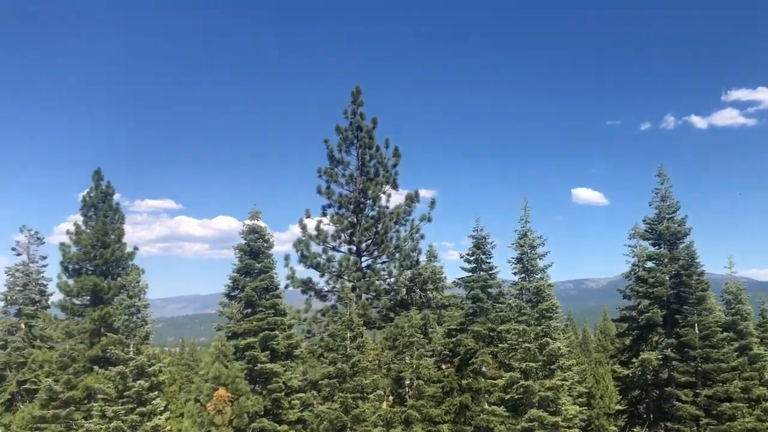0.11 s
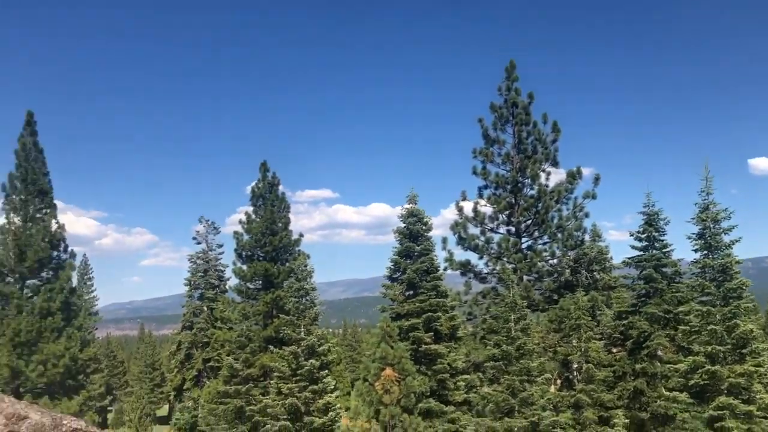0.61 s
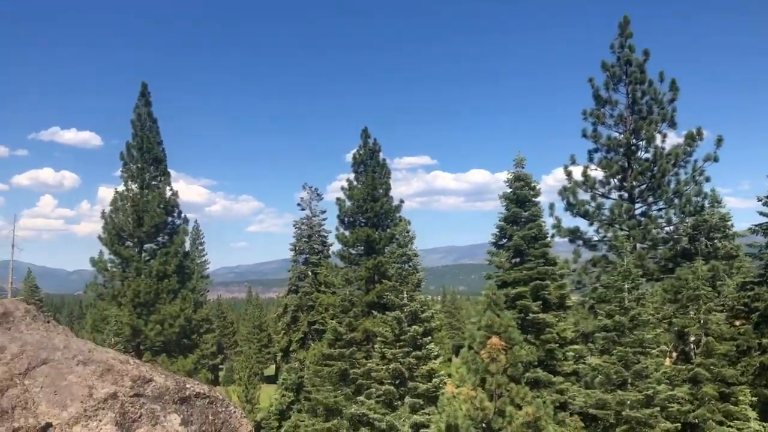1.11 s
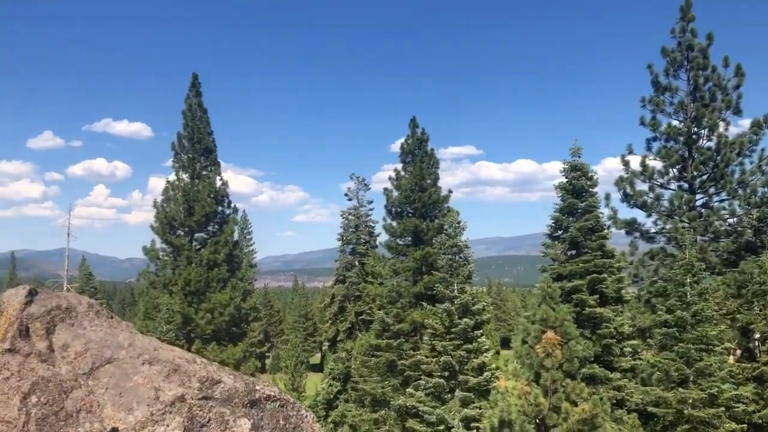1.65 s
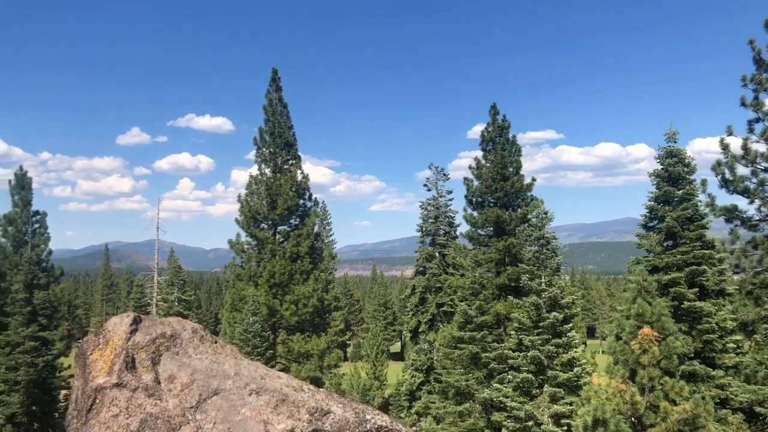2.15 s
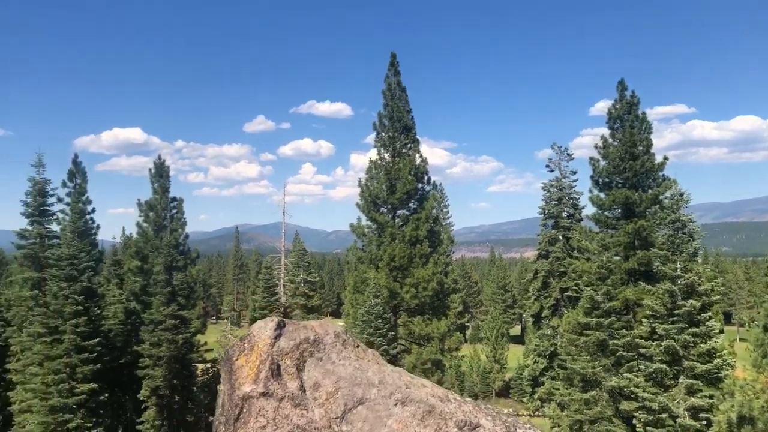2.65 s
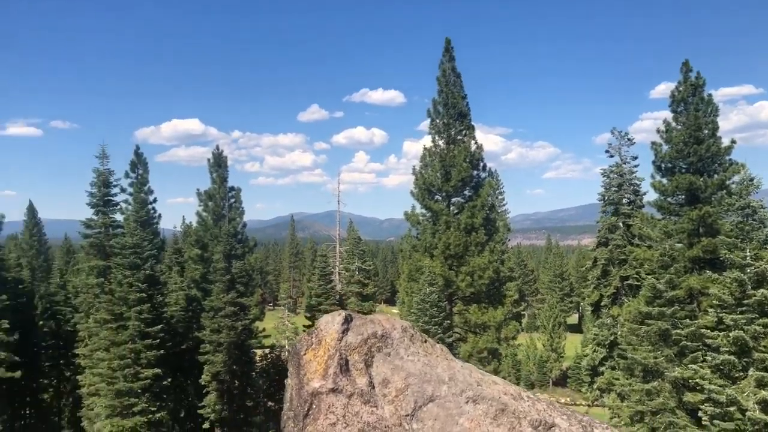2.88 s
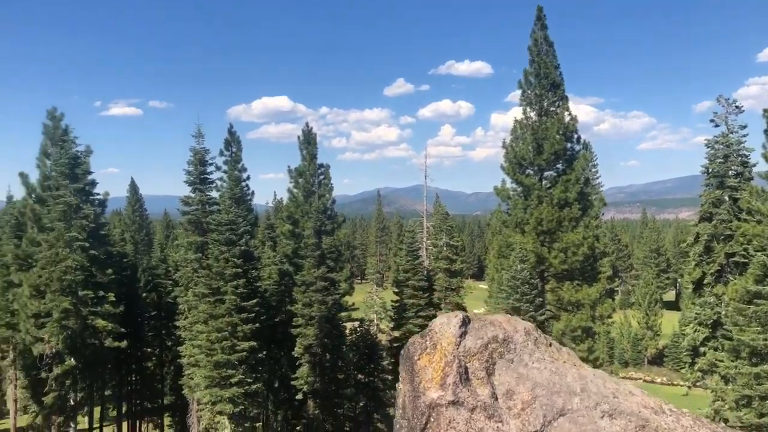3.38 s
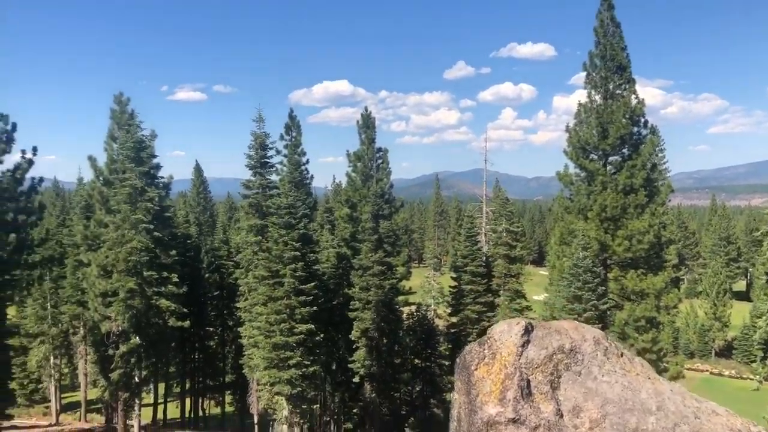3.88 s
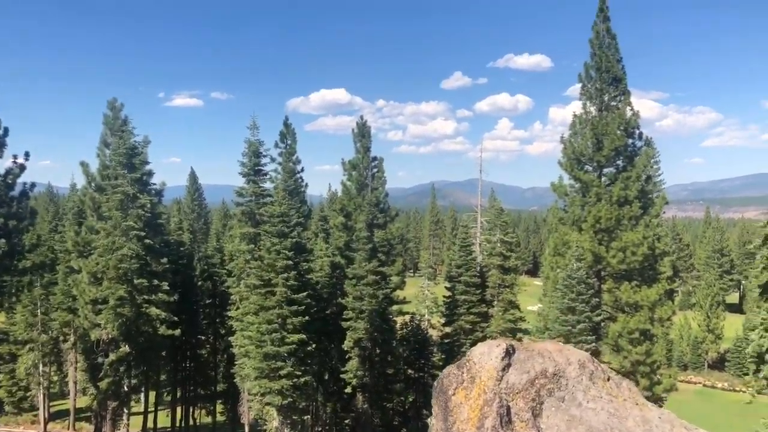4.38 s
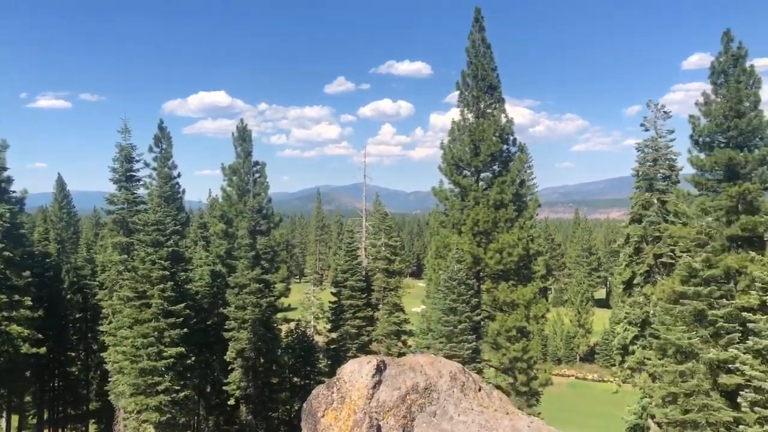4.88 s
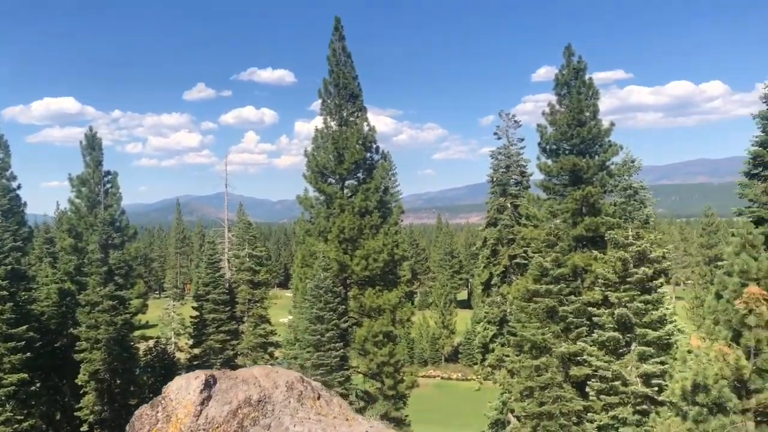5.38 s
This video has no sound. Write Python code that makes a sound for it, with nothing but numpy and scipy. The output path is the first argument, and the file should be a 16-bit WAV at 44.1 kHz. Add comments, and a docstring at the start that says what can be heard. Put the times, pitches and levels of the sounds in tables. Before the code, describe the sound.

Close to a phone microphone in the open, someone shifts on a rock above a pine forest. Soles scuff and grit cracks sharply from the start; around one second weight lands with dull thuds and small metal pieces clink briefly. Movement stays busy until about two seconds, then thins to sparse scuffs and soft thuds. Faint far wind and a wavering low hum continue underneath, with a deep soft thud near the end.

```python
"""Someone shifts about on a rock above a pine forest, holding a phone.
Far wind (shaped noise) and a low hum (two tones and a fuzzy band) lie under it all; a faint gust comes early.
From the start, soles scuff (grainy noise) and crack grit (noise bursts that ring), and weight lands with
dull thuds (short low tones). From about 0.9 to 1.9 s small metal pieces clink (fading sines).
Then the scuffs, cracks and thuds thin out, and a deep thud comes near the end, at 4.8 s."""
import sys
import numpy as np
from scipy import signal
from scipy.fft import rfft, irfft
from scipy.io import wavfile
from scipy.ndimage import uniform_filter1d

SR = 44100
rng = np.random.default_rng(int(sys.argv[2]) if len(sys.argv) > 2 else 0)


def transcribe(u):
    """Save the signal u as a 16-bit wav file named by the first command-line argument.

    u: samples, shape (n,) or (channels, n), limited to [-1, 1]; the rate is SR.
    q: integer samples, one column per channel.
    """
    v = np.clip(np.atleast_2d(u).T, -1, 1)
    q = np.round(v * 32767).astype(np.int16)
    wavfile.write(sys.argv[1], SR, q)


def boost(x):
    """Linear amplitude factor 10**(x/20) for a level x in decibels (scalar or array-like)."""
    u = np.asarray(x, float) / 20
    return 10 ** u


N = 243431  # length in samples, about 5.5 s

# Tone colour of wind in distant pines and the far valley rumble: f/Hz, level per Hz/dB
WIND_COLOUR = [(15, -86), (25, -25.5), (55, -10.5), (110, -6), (236, -10), (427, -16.5), (734, -23),
               (1100, -26), (2110, -37.5), (4500, -43.5), (10700, -49.5), (16000, -53.5)]
# How the hum wavers: t/s, level of low tone/dB, level of high tone/dB
HUM_LEVELS = [(0, -62, -54.5), (1.1, -63, -57), (1.4, -59, -77), (2, -57.5, -61), (2.8, -57.5, -58.5),
              (3.3, -56.5, -55.5), (3.5, -71, -56), (3.75, -58, -52), (4.4, -63.5, -53.5), (5.52, -69, -61)]
# Small metal pieces; each is a list of its modes (the tones it rings at): f/Hz, level/dB, time to fade by 60 dB/s
METAL_PIECES = [
    [(7940, 0, .065), (9520, 0, .065), (12530, -12, .045), (15500, -11, .05)],
    [(5650, 0, .03), (12200, 0, .05)],
    [(6440, 0, .06), (8740, 0, .035), (10600, -9, .08)],
    [(14050, 0, .035), (9950, 0, .035)],
    [(4850, 0, .15)],
]
# Blows on the metal; the pitch picks the piece: t/s, level/dB, pitch f/Hz, upper modes' extra level/dB
CLINK_BLOWS = [(.8824, -59, 7840, 4.5), (.9153, -57, 6440, -14), (.9338, -59, 7870, -8),
               (.9986, -58.5, 7880, -11), (1.051, -67, 7940, -12), (1.0964, -49.5, 7950, -6.5),
               (1.1348, -52.5, 7970, -12), (1.486, -50, 13700, -13), (1.496, -61.5, 6440, 4),
               (1.5643, -61, 5500, -6), (1.613, -62, 7760, -17), (1.6402, -57.5, 6440, 3.5),
               (1.7114, -55, 5600, -8), (1.7978, -53, 5580, -10), (1.8427, -61, 5650, -19),
               (1.9014, -65, 4850, -2)]
# Weight landing on the rock: t/s, peak level/dB, pitch f/Hz, time to fade by 60 dB/s
THUD_LANDINGS = [(0.3073, -46.5, 301, 0.029), (.8845, -38.5, 253, 0.022), (.9025, -34, 280, 0.032),
                 (.918, -34.5, 156, 0.081), (0.938, -38, 330, 0.025), (1.348, -46.5, 137, 0.13),
                 (1.588, -38.5, 190, 0.065), (1.599, -38.5, 206, 0.041), (1.875, -43, 445, 0.033),
                 (1.896, -44, 257, 0.044), (2.388, -41, 203, 0.052), (2.416, -38, 232, 0.038),
                 (2.475, -41, 258, 0.033), (3.138, -39.5, 236, 0.048), (3.159, -44, 290, 0.039),
                 (3.858, -42, 260, 0.054), (4.81, -42, 81, .26)]
# Soles and cloth dragged over stone, one row a stroke: middle t/s, length/s, level/dB, hiss against body/dB
SCUFF_STROKES = [(0.042, 0.048, -62, -2.5), (0.1, 0.041, -60.5, -3), (0.211, 0.15, -70.5, 1),
                 (0.337, 0.12, -65.5, -3), (0.435, 0.061, -67.5, 9), (0.46, 0.63, -75.5, 8),
                 (0.923, 0.088, -54, -11), (1.015, 0.17, -62.5, -7), (1.114, 0.052, -60, -22),
                 (1.362, 0.39, -68.5, 1.5), (1.49, 0.031, -51, -23), (1.59, 0.13, -69, 1),
                 (1.648, 0.047, -49.5, -31), (1.748, 0.18, -64, -1.5), (1.87, 0.17, -62.5, -11),
                 (2.06, 0.24, -68, -4.5), (2.162, 0.12, -69.5, -11), (2.457, 1, -72, -5),
                 (3.269, 0.15, -67, -3.5), (3.97, 0.49, -72.5, -9), (4.464, 0.048, -64.5, -27)]
# Tone colour of the dull part of a scuff: f/Hz, level per Hz/dB
SCUFF_BODY_COLOUR = [(200, -6), (500, 21), (1300, 4.5), (2300, 7), (3500, -7), (10000, -16)]
# Tone colour of the bright part of a scuff: f/Hz, level per Hz/dB
SCUFF_HISS_COLOUR = [(1000, -16), (2500, -3), (5500, 0), (9000, -6), (16000, -9)]
# Pitches of four grain sizes, each snapping at its own moments: f/Hz
GRAIN_PITCHES = [900, 1600, 2600, 4200]
# The loudest grit cracking under a sole: t/s, level/dB, knock f/Hz, treble against that level/dB
GRIT_CRACKS = [(0.0355, -44.5, 1690, -11.5), (0.092, -53, 3400, 11), (.124, -51, 1220, -16),
               (0.3055, -45, 1700, 6.5), (.883, -43, 1370, -10), (0.894, -58, 1750, -20),
               (.9021, -51, 1170, 4.5), (0.916, -55, 1750, -14), (.9275, -43, 1280, -20),
               (0.9367, -42.5, 1820, -14), (0.955, -55, 2610, -17), (0.9985, -44.5, 2190, -28),
               (1.004, -49.5, 1310, -24), (1.0105, -58, 1900, -20), (1.096, -48.5, 3550, -5),
               (1.096, -46.5, 1400, -26), (1.1124, -49, 1210, -24), (1.127, -54, 3500, -6),
               (1.1346, -50.5, 1900, -11), (1.4851, -41, 4640, -8), (1.5865, -50.5, 1410, -21),
               (1.596, -44.5, 1570, -18), (1.612, -48, 1380, -9), (1.637, -42.5, 1830, -21),
               (1.6461, -40, 2180, -12), (1.6518, -38, 1380, -7.5), (1.7472, -55, 2200, -28),
               (1.755, -46, 2210, -22), (1.7918, -42, 1970, -17), (1.8073, -50, 1510, -14),
               (1.85, -60, 1270, -10), (1.8774, -51, 1990, -9), (1.8995, -65, 1980, -22),
               (1.9142, -37, 2190, -17), (1.9294, -51, 1950, -4), (1.954, -55.5, 2780, -10),
               (2.125, -53.5, 2230, -16), (2.157, -57, 1720, -24), (2.414, -51, 1230, -13),
               (2.615, -57.5, 1880, -23), (3.137, -52.5, 1670, -5.5), (3.1385, -51, 5000, -14),
               (3.4, -57.5, 3130, -23), (3.926, -63, 2630, -10), (3.964, -56, 1580, -21),
               (4.025, -56, 2200, -8), (4.111, -59.5, 1910, -20)]
# Tones a loose stone rings at: multiple of the knock pitch (no unit), level/dB
STONE_MODES = [(.6, -5), (1, 0), (1.66, -8)]

WIND_DB, GUST_WAVER_DB = -54.5, 0.7
GUST_PEAK_S, GUST_LENGTH_S, GUST_PEAK_DB = 0.39, 2.6, 1  # one long gust passes early
LOW_HZ, HIGH_HZ, DRONE_HZ = 60.76, 130.4, 102.3
DRONE_DB, DRONE_WAVER_DB = -63, 3  # the fuzzy band between the tones comes and goes
DRONE_FOLLOWS = 0.99  # share of the high tone's dB changes that the band takes over
GRIT_PER_S, GRIT_SPREAD_DB = 250, 3  # snaps per second for each grain size
BODY_GRIT_SHARE, HISS_GRIT_SHARE = 0.65, 0.25  # snaps against smooth noise
CRACK_RISE_S, CRACK_T60_S = 0.0002, 0.022  # T60 is the time to fade by 60 dB
# Width as a share of the knock pitch, for treble at 0 dB; a duller crack rings more purely
KNOCK_WIDTH, NARROWS_PER_DB, NARROWEST = 0.55, 0.015, 0.27
MODE_SPREAD_DB, LOW_LAG_CYCLES = 2, 2.99  # no two stones alike; the lower mode comes later
CRUNCH = 0.3  # broad crushed sound around each knock, as a factor


def evened(x):
    """Scales to an rms (average strength) of one."""
    return x / np.sqrt(np.mean(x ** 2) + 1e-20)


def add(mix, s, sound):
    """Mixes a sound in at a time in seconds, cutting what runs past the end."""
    part = mix[round(s * SR):][:len(sound)]
    part += sound[:len(part)]


def coloured(x, points):
    """Filters a long signal by a spectrum, then scales it to an rms of one."""
    f, db = np.transpose(points)
    hz = np.fft.rfftfreq(len(x), 1 / SR)
    curve_db = np.interp(np.log(hz + 1), np.log(f + 1), db)
    return evened(irfft(rfft(x) * boost(curve_db), len(x)))


def band(x, hz, width):
    """Keeps the sound around one pitch, as a resonance does, with a peak of one."""
    out = signal.lfilter(*signal.iirpeak(hz, hz / width, SR), x)
    return out / abs(out).max()


def steep_band(x, hz, width):
    """Passes through the same resonance twice, so less is left on either side."""
    return band(band(x, hz, width), hz, width)


def wander(per_s):
    """Random drift of rms one; a higher rate drifts faster."""
    steps = round(SR / per_s)
    return evened(uniform_filter1d(uniform_filter1d(rng.standard_normal(N), steps), steps))


def wind():
    """Wind far off is smooth noise; its level swells with one gust and drifts a little."""
    t = np.arange(N) / SR
    gust_db = GUST_PEAK_DB * np.exp(-((t - GUST_PEAK_S) / GUST_LENGTH_S) ** 2)
    gust_db = gust_db + GUST_WAVER_DB * wander(4.0)
    return boost(WIND_DB + gust_db) * coloured(rng.standard_normal(N), WIND_COLOUR)


def unsteady_tone(hz, drift_hz):
    """A sine of rms one whose pitch drifts slowly."""
    cycles = np.cumsum(hz + drift_hz * wander(3.6)) / SR
    return np.sqrt(2) * np.sin(2 * np.pi * cycles)


def hum():
    """Two slightly unsteady tones, and narrow noise between them that sounds fuzzy."""
    s, low_db, high_db = np.transpose(HUM_LEVELS)
    t = np.arange(N) / SR
    low = boost(np.interp(t, s, low_db))
    high = boost(np.interp(t, s, high_db))
    flutter = boost(2.36 * wander(23))
    tones = low * unsteady_tone(LOW_HZ, 0.9) + high * flutter * unsteady_tone(HIGH_HZ, 0.81)
    fuzz = evened(steep_band(rng.standard_normal(N), DRONE_HZ, 20))
    drone_level = boost(DRONE_DB + DRONE_WAVER_DB * wander(5.2)) * (high / high.mean()) ** DRONE_FOLLOWS
    return tones + drone_level * fuzz


def clinks():
    """Each blow starts all modes of its piece at once; how it hangs shifts the pitch a little."""
    t, out = np.arange(5000) / SR, np.zeros(N)
    for s, db, pitch_hz, upper_db in CLINK_BLOWS:
        # the piece whose first mode is nearest in pitch
        modes = min(METAL_PIECES, key=lambda piece: abs(np.log(piece[0][0] / pitch_hz)))
        shift = pitch_hz / modes[0][0]
        for k, (hz, mode_db, t60) in enumerate(modes):
            level_db = db + mode_db + upper_db * (k > 0)
            fade = boost(level_db - 60 * t / t60)
            add(out, s, fade * np.sin(2 * np.pi * hz * shift * t))
    return out


def thuds():
    """A soft low push rings a few cycles, with a puff of crushed dirt above it."""
    t, out = np.arange(8000) / SR, np.zeros(N)
    for s, db, hz, t60 in THUD_LANDINGS:
        shape = (1 - np.exp(-t / 0.0018)) ** 2 * boost(-60 * t / t60)  # soft start, then fade
        ring = shape * np.sin(2 * np.pi * hz * t)
        dirt = steep_band(shape * rng.standard_normal(len(t)), 1.7 * hz, 0.8 * hz)
        add(out, s, boost(db) * (ring / abs(ring).max() + 0.57 * dirt))
    return out


def grit_snaps():
    """Grains of four sizes snap at random moments, some harder than others; rms one."""
    shape = (len(GRAIN_PITCHES), N)
    strength = boost(GRIT_SPREAD_DB * np.minimum(rng.exponential(1, shape), 3))
    hits = strength * (rng.random(shape) < GRIT_PER_S / SR)
    puffs = signal.lfilter([1], [1, -0.97], hits) * rng.standard_normal(shape)  # about a millisecond each
    snaps = np.zeros(N)
    for puff, hz in zip(puffs, GRAIN_PITCHES):
        snaps += np.sqrt(hz) * evened(band(puff, hz, 0.5 * hz))
    return evened(snaps)


def rub(snaps, share):
    """Blends grit snaps with smooth noise, keeping the overall strength."""
    return share * snaps + np.sqrt(1 - share ** 2) * rng.standard_normal(N)


def scuffs():
    """Rubbing over grit makes a dull body and a hiss that swell and fade with each stroke."""
    t, out = np.arange(N) / SR, np.zeros(N)
    snaps = grit_snaps()
    # the quick random levels make the grains come in bunches
    body = coloured(rub(snaps, BODY_GRIT_SHARE), SCUFF_BODY_COLOUR) * boost(2.66 * wander(480))
    hiss = coloured(rub(snaps, HISS_GRIT_SHARE), SCUFF_HISS_COLOUR) * boost(2.3 * wander(300))
    for s, length, level_db, treble_db in SCUFF_STROKES:
        stroke = np.exp(-(3 * (t - s) / length) ** 2)
        out += boost(level_db) * stroke * (body + boost(treble_db) * hiss)
    return out


def cracks():
    """A puff of noise rings the modes of a loose stone and spits treble; a sharper crack reaches higher."""
    t, out = np.arange(2000) / SR, np.zeros(N)
    shape = (1 - np.exp(-t / CRACK_RISE_S)) * boost(-60 * t / CRACK_T60_S)
    for s, db, hz, treble_db in GRIT_CRACKS:
        dull, bright = shape * rng.standard_normal((2, len(t)))
        width = max(KNOCK_WIDTH + NARROWS_PER_DB * treble_db, NARROWEST) * hz
        knock = CRUNCH * steep_band(bright, 0.85 * hz, hz)
        for k, mode_db in STONE_MODES:
            off_db = MODE_SPREAD_DB * rng.standard_normal() * (k != 1)  # the main mode keeps its level
            lag = round(LOW_LAG_CYCLES * SR / hz * (k < 1))  # in cycles of the knock pitch
            knock += boost(mode_db + off_db) * np.roll(steep_band(dull, k * hz, width), lag)
        top_hz = np.clip(15002 + 600 * treble_db, 7000, 15500)
        spit = signal.lfilter(*signal.butter(3, [3000, top_hz], "band", fs=SR), bright)
        add(out, s, boost(db) * (knock + boost(treble_db) * spit / abs(spit).max()))
    return out


def scene():
    """Adds all layers; cracks and clinks also get one bounce off the rock, 3.7 ms later."""
    near = clinks() + cracks()
    bounce = np.roll(near, round(0.0037 * SR)) * boost(-11.0)
    return (wind() + hum() + thuds() + scuffs() + near + bounce)[None]


def low_pass(x):
    """Removes everything above the highest recorded frequency."""
    return signal.sosfilt(signal.butter(12, 16460, fs=SR, output="sos"), x)


def record(dry):
    """A steep filter takes away what lies above about 16 kHz."""
    edge = signal.firwin(255, 15950, window=("kaiser", 5), fs=SR)
    mix = signal.oaconvolve(dry, edge[None], "same")
    return low_pass(mix)


dry = scene()
out = record(dry)
transcribe(out)
```